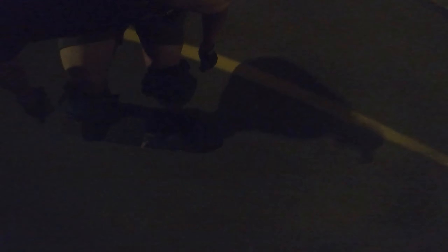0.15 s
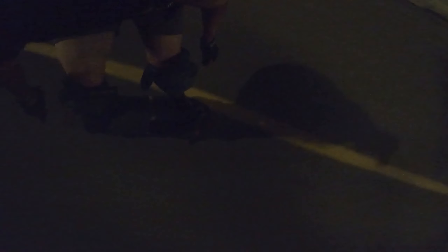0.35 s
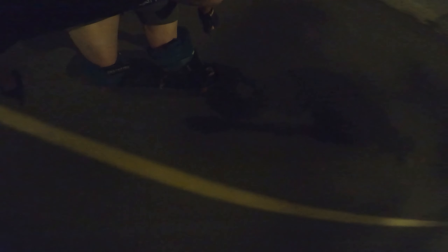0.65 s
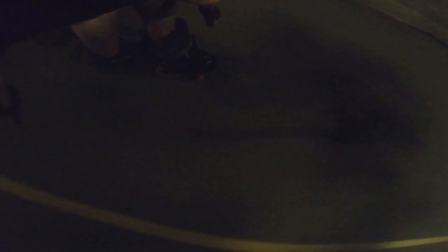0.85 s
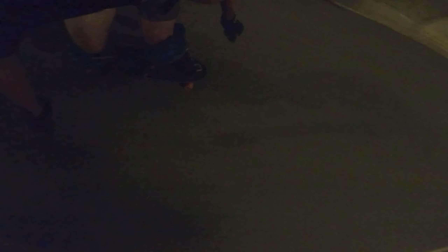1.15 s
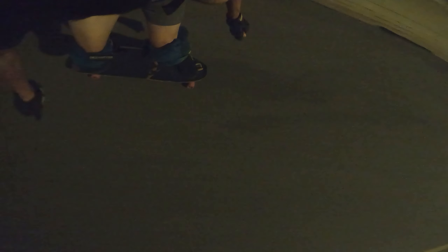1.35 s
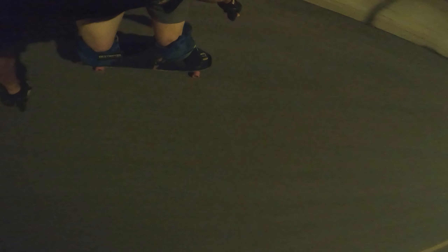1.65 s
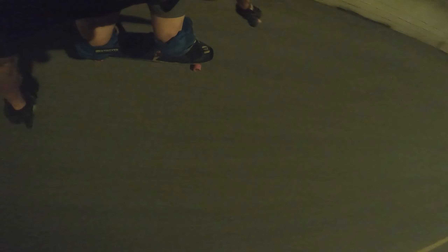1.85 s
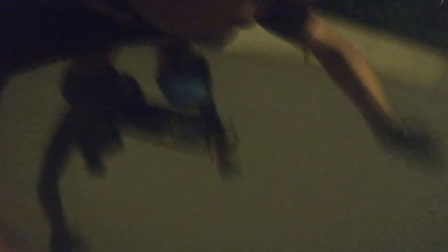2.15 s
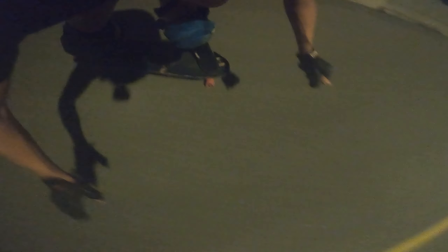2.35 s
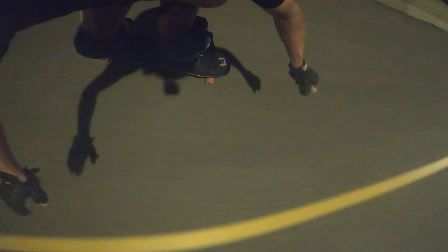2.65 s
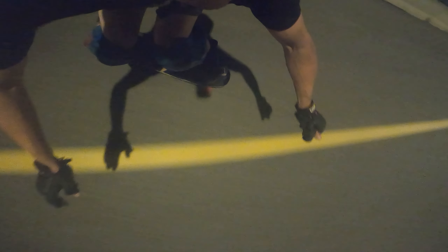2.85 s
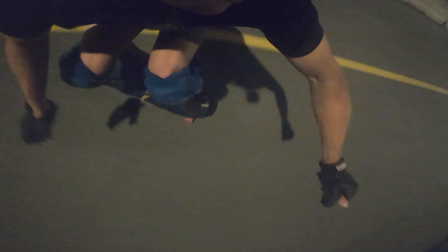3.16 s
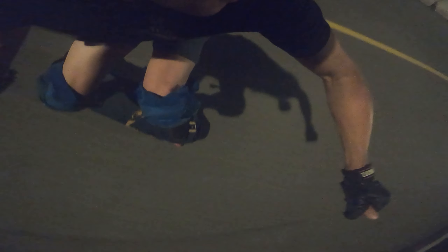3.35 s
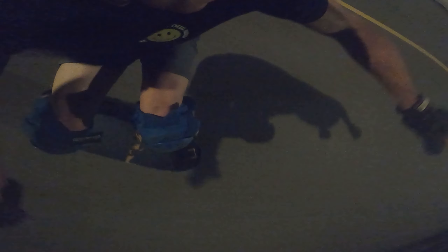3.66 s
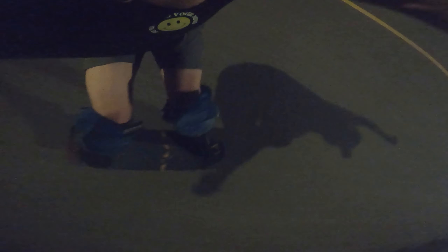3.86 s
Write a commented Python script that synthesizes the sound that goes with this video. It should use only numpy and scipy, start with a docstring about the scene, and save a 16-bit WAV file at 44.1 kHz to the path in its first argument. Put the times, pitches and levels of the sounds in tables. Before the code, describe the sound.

Skateboard wheels roar on asphalt with low buffeting wind and faint rattling ticks; around two seconds the camera case is knocked, scraped and shaken, then rolling continues quieter. Muffled, close, body-worn microphone outdoors.

```python
"""Longboard from a helmet camera

A camera in a closed case rides above a longboard on asphalt. Wind and wheel roar are shaped noise bands; the case
adds a tone, and a loose part's random clicks ring high bands. The rider's head jerks: the mount shakes as a wavering
low sine with noise overtones, noise bursts and grit ring the case as knocks and scrapes. It is quieter for a while after.
"""
import sys
import numpy as np
from scipy import signal
from scipy.fft import rfft, irfft, next_fast_len
from scipy.io import wavfile
from scipy.ndimage import uniform_filter1d, map_coordinates

SR = 44100
rng = np.random.default_rng(int(sys.argv[2]) if len(sys.argv) > 2 else 0)


def transcribe(signal):
    """Save signal, clipped to [-1, 1], as a 16-bit WAV file at the path in sys.argv[1]."""
    frames = np.atleast_2d(signal).T
    limited = np.clip(frames, -1, 1)
    pcm = np.round(limited * 32767).astype(np.int16)
    wavfile.write(sys.argv[1], SR, pcm)


def invert_db(x):
    """Field ratio 10**(x/20) for x, a level in decibels (scalar or array-like)."""
    u = np.asarray(x, float) / 20
    return 10 ** u


N = 176400

# Wind before and after its gap: time_s, rumble_db, flutter_db
WIND_LEVELS = [
    [(0.0, -31.5, -40.5), (0.22, -31.5, -36.5), (0.43, -27, -35), (0.47, -21, -54), (0.49, -31, -36),
     (0.83, -27.5, -34), (1.2, -34.5, -33.5), (1.22, -26, -33.5), (1.32, -40, -36), (1.4, -36, -42),
     (1.43, -34.5, -32.5), (1.99, -36.5, -30.5), (2.0, -15.5, -25)],
    [(2.8, -39, -67), (2.832, -44, -41), (2.98, -53, -53), (3.016, -36.5, -42), (3.226, -47.5, -49.5),
     (3.38, -39, -35), (3.394, -48, -45), (3.466, -28, -41.5), (3.522, -48.5, -57), (3.552, -27, -48),
     (3.66, -47, -61), (3.676, -33.5, -39.5), (3.98, -20, -25.5)],
]
# Wind spectra: freq_hz, relative_db
RUMBLE_COLOUR = [(10, -17), (20, -10.5), (50, 5.5), (70, -11), (100, -27), (200, -96)]
FLUTTER_COLOUR = [(40, -33), (70, 0), (100, 1.5), (150, -4), (200, -28.5), (400, -98.5)]
# Mount shaking: time_s, swing_rms_db, overtone_relative_db
SHAKE_LEVELS = [(1.98, -51, -37), (2.022, -19.5, -38), (2.064, -29, -28.5), (2.104, -40, -37),
                (2.142, -10.5, -26.5), (2.168, -19.5, -27.5), (2.21, -10, -31.5), (2.248, -22.5, -21.5),
                (2.286, -16, -16), (2.318, -11.5, -31.5), (2.34, -16, -23), (2.358, -28, -39),
                (2.382, -23, -27), (2.4, -39, -40.5), (2.426, -14, -17), (2.442, -11.5, -24),
                (2.468, -10, -34), (2.494, -42, -18), (2.514, -14, -30.5), (2.538, -42, -58),
                (2.548, -25, -37), (2.566, -20, -33), (2.6, -33, -36), (2.618, -34, -59),
                (2.648, -28.5, -54), (2.688, -51, -44.5), (2.732, -26.5, -44.5), (2.754, -34, -58),
                (2.776, -47, -42), (2.82, -42, -53)]
# Shaking overtone spectrum: freq_hz, relative_db
OVERTONE_COLOUR = [(53, -33.5), (90, 4), (205, -5.5), (371, -13), (411, -29.5), (700, -20), (910, -61.5),
                   (1540, -120)]
# Scrapes inside the wall: start_s, rise_s, fall_s, level_db, tilt_db_per_octave, favoured_hz
SCRAPES = [(1.953, 0.031, 0.012, -20.5, 1.5, 3950), (2.0, .01, 0.065, -29.5, .5, 6400),
           (2.102, 0.1, 0.023, -29.5, -9, 3300), (2.245, 0.014, 0.031, -26.5, -4.5, 700),
           (2.258, .024, 0.0038, -11.5, 1.5, 6900), (2.287, 0.012, .008, -18, -9, 2700),
           (2.32, 0.0088, 0.0052, -29, -19, 1360), (2.387, 0.027, 0.049, -30, -5.5, 3300),
           (2.431, 0.016, 0.0094, -21.5, -10.5, 1850), (2.453, 0.012, 0.0043, -22, -5.5, 1360),
           (2.48, 0.0097, 0.013, -41, 1.5, 700)]
# Knocks inside the wall: start_s, peak_db, tilt_db_per_octave, spread_s, favoured_hz
KNOCKS = [(1.9734, -2.5, 2, 0.0036, 3950), (1.9946, -9.5, 2, 0.0033, 3300),
          (2.2422, -14, -12, 0.0029, 1900), (2.2851, -1, 5, 0.0013, 3300), (2.301, -9.5, -6, .003, 1360),
          (2.3461, -18, -6, 0.00067, 2650), (2.377, -12, 0.5, 0.0035, 2550)]
# Case resonances: centre_hz, width_hz, relative_db
CASE_MODES = [(700, 220, -9), (1360, 150, 4.5), (1850, 360, -6.5), (2627, 450, -4.5), (3300, 170, 0.5),
              (3950, 150, 0.5), (4690, 1100, -5.5), (6400, 500, -17.5), (6900, 150, -10),
              (8800, 1200, -28.5), (10600, 2500, -31.5), (11700, 600, -25)]
# Loose part's rattle: time_s, then relative_db of the low, middle and high ringing bands
RATTLE_LEVELS = [(0.0, -49, -77.5, -94.5), (0.4, -55, -77, -90), (0.66, -58.5, -79, -96),
                 (0.88, -56.5, -77.5, -89), (1.17, -57, -69, -87), (1.43, -54, -66.5, -87),
                 (1.65, -55.5, -68.5, -89), (1.94, -57, -70.5, -83), (2.17, -51, -67.5, -74.5),
                 (2.33, -60, -67, -81), (2.5, -58, -72.5, -85.5), (2.79, -61, -74, -97),
                 (3.04, -59.5, -82.5, -100), (3.44, -63, -82.5, -99), (3.81, -70, -76.5, -86),
                 (3.95, -64, -72, -87)]
# Low rattle band's slow rise and fall in level: time_s, added_db
LOW_BAND_SWELL = [(0, -14), (.75, -7), (.95, -1.5), (2.45, -2.5), (2.6, -5), (4, -13.5)]
# Loose part's resonances, one list a band: centre_hz, width_hz, db_per_pass
PART_BANDS = [
    [(3997, 270, 0)],
    [(6400, 650, 10), (6880, 200, -8.5)],
    [(10700, 350, -9.5), (12000, 640, 0.5), (13300, 400, -11.5)],
]
# Louder single rattles: start_s, peak_db
TICKS = [(.818, -42), (0.9862, -34.5), (1.0825, -35), (1.2146, -35.5), (1.243, -32), (1.296, -38),
         (1.3088, -30.5), (1.3464, -30), (1.356, -43), (1.4672, -37.5), (1.484, -33.5), (1.571, -29.5)]
# Tick resonances: centre_hz, width_hz, db_per_pass
TICK_MODES = [(2940, 360, -2.5), (3810, 390, 1), (6400, 450, -7.5), (12050, 800, -21)]
# Wheels: time_s, low_roar_db, middle_roar_db, upper_roar_db, case_tone_db, hiss_db
WHEEL_LEVELS = [(0.0, -37, -36.5, -42.5, -40.5, -43), (0.19, -32.5, -38, -44.5, -37.5, -43),
                (0.42, -35.5, -35.5, -41.5, -34.5, -42.5), (0.65, -37, -39.5, -44.5, -37, -44.5),
                (0.91, -35.5, -41.5, -43.5, -34.5, -43.5), (1.12, -36, -47, -42.5, -36, -41.5),
                (1.38, -34.5, -41.5, -42, -35.5, -42), (1.63, -33.5, -42.5, -41, -34, -41),
                (1.85, -32.5, -40, -37, -33, -39.5), (2.01, -35.5, -39, -41, -35, -41.5),
                (2.15, -46.5, -43, -39, -30.5, -35.5), (2.29, -30.5, -36.5, -36, -32, -34),
                (2.35, -37.5, -51, -55, -38.5, -41.5), (2.44, -43.5, -45, -40, -52, -44.5),
                (2.53, -54, -56, -50, -44, -51.5), (2.65, -46, -58, -53, -44, -50),
                (2.84, -47.5, -56.5, -51, -44, -50), (3.17, -42, -49, -49, -41, -49.5),
                (3.4, -41.5, -49.5, -48, -42, -47.5), (3.59, -42.5, -41.5, -45.5, -36.5, -46),
                (3.86, -41, -40.5, -44.5, -39.5, -46), (3.98, -37, -36, -38.5, -34.5, -39.5)]
# Wheel spectra: freq_hz, relative_db
LOW_ROAR_COLOUR = [(100, -22.5), (150, -3.5), (205, -5), (255, 1.5), (310, -6), (370, -21.5), (600, -79)]
MIDDLE_ROAR_COLOUR = [(250, -40), (350, -9.5), (445, 2), (540, -7), (620, -8), (800, -31), (1500, -89)]
UPPER_ROAR_COLOUR = [(350, -36.5), (580, -14), (700, 0), (900, -3), (1020, 2), (1150, 1), (1500, -23.5),
                     (2500, -83.5)]
HISS_COLOUR = [(1300, -22), (1550, 5), (1800, 0), (2200, -14.5), (2700, -8.5), (3300, -7.5), (4200, -15),
               (4550, -19), (4850, -16.5), (5150, -24), (5600, -26.5), (6500, -31), (7200, -35),
               (8700, -39.5), (9300, -50), (11200, -61), (14000, -77.5)]

FLOOR_DB = -112
SHAKE_HZ, SHAKE_WANDER = 43.3, 0.2  # mean pitch, wander as a fraction of it
GRIT_PER_S, GRIT_SPREAD_DB = 3000, 5
FAVOUR_DB, FAVOUR_OCTAVES = 7.5, 0.062
WALL_HZ = 5400
RATTLES_PER_S, RATTLE_SPREAD_DB, RATTLE_GAIN_DB = 600, 4, 5
CASE_TONE_HZ, CASE_TONE_WIDTH_HZ = 1333.6, 309  # width of one pass
DIP_S, DIP_WIDTH_S, DIP_DB = 2.362, 0.011, -4
CEILING = 0.97


def unit(x):
    """Scale to rms 1."""
    return x / np.sqrt(np.mean(x ** 2) + 1e-20)


def curves(rows):
    """Interpolate each column after the time, one value a sample."""
    time_s, *columns = np.transpose(rows)
    return [np.interp(np.arange(N) / SR, time_s, column) for column in columns]


def wobble(knots_per_s):
    """Smooth random curve through Gaussian knots."""
    knots = rng.standard_normal(int(N * knots_per_s / SR) + 4)
    return map_coordinates(knots, [np.arange(N) * knots_per_s / SR])


def filtered(x, response):
    """Multiply the spectrum of x by a response of frequency."""
    size = next_fast_len(len(x) + 8192)
    return irfft(rfft(x, size) * response(np.fft.rfftfreq(size, 1 / SR)), size)[:len(x)]


def colour(points):
    """Gain through (freq_hz, relative_db) points on a log axis."""
    freq_hz, gain_db = np.transpose(points)
    return lambda hz: invert_db(np.interp(np.log(hz + 1), np.log(freq_hz + 1), gain_db))


def body(modes, tilt_db=0, favoured_hz=1):
    """Causal sum of resonances tilted about 3 kHz; the contact point excites those near favoured_hz more."""
    def gain(centre, db):
        octaves_off = np.log2(centre / favoured_hz)
        favour_db = FAVOUR_DB * np.exp(-(octaves_off / FAVOUR_OCTAVES) ** 2)
        return invert_db(db + tilt_db * np.log2(centre / 3000) + favour_db)

    def response(f):
        total = 0
        for k, (centre, width, db) in enumerate(modes):
            mode = 1j * f * width / (centre * centre - f * f + 1j * f * width)
            total = total + (-1) ** k * gain(centre, db) * mode  # alternating polarity
        return total
    return response


def steep(modes):
    """Sum of resonances, each applied twice for steeper skirts."""
    return lambda f: sum(body([mode])(f) ** 2 for mode in modes)


def patchy(spread_db):
    """White noise with time-frequency patches of random gain."""
    z = signal.stft(rng.standard_normal(N), nperseg=512)[2]
    field = uniform_filter1d(rng.standard_normal(z.shape), size=5, axis=0)
    field = uniform_filter1d(field, size=6, axis=1)
    return signal.istft(z * invert_db(spread_db * unit(field)), nperseg=512)[1][:N]


def grains(count, per_s, spread_db):
    """Random clicks of uneven size and sign."""
    u, size = rng.random((2, count)), rng.standard_normal(count)
    return (u[0] < per_s / SR) * np.sign(u[1] - 0.5) * invert_db(spread_db * size)


def blow(ring, spread_s):
    """Short burst of contact noise rings a body; peak 1."""
    t = np.arange(SR // 10) / SR
    contact = rng.standard_normal(len(t)) * np.exp(-t / spread_s) * (1 - np.exp(-t / 0.00049))
    x = filtered(contact, ring)
    return x / np.abs(x).max()


def add(out, start_s, x):
    """Mix x into out at start_s."""
    out[round(start_s * SR):][:len(x)] += x


def noise_floor():
    """Faint white noise."""
    return invert_db(FLOOR_DB) * rng.standard_normal(N)


def wind():
    """Lumpy buffeting: one uneven noise in rumble and flutter bands, silent for a gap."""
    air = patchy(0.51) * invert_db(0.53 * wobble(21))
    levels = curves(WIND_LEVELS[0] + WIND_LEVELS[1])
    bands = RUMBLE_COLOUR, FLUTTER_COLOUR
    out = sum(invert_db(db) * unit(filtered(air, colour(band))) for db, band in zip(levels, bands))
    gap = np.interp(np.arange(N) / SR, [1.98, 2.02, 2.78, 2.82], [1, 0, 0, 1])
    return gap * out


def shake():
    """The mount swings at a wavering low pitch; rough noise overtones ride on it."""
    first_s, last_s = SHAKE_LEVELS[0][0], SHAKE_LEVELS[-1][0]
    rows = [(first_s - 0.03, -70, -70)] + SHAKE_LEVELS + [(last_s + 0.03, -70, -70)]
    swing_db, overtone_db = curves(rows)
    phase = 2 * np.pi * np.cumsum(SHAKE_HZ * (1 + SHAKE_WANDER * wobble(15))) / SR
    swing = invert_db(swing_db) * np.sqrt(2) * np.sin(phase)
    rough = invert_db(2.65 * wobble(60)) * patchy(0.37)
    return swing + invert_db(overtone_db + 1.5) * unit(filtered(rough, colour(OVERTONE_COLOUR)))


def scrapes():
    """Grit under a stroke that swells and fades rings the case."""
    out, t = np.zeros(N), np.arange(SR // 4) / SR
    for start_s, rise_s, fall_s, db, tilt_db, hz in SCRAPES:
        clicks = grains(len(t), GRIT_PER_S, GRIT_SPREAD_DB)
        grit = unit(filtered(clicks, body(CASE_MODES, tilt_db, hz)))
        fade = np.exp(-np.abs(t - rise_s) / fall_s)
        stroke = np.where(t < rise_s, (t / rise_s) ** 0.87, fade)
        add(out, start_s, invert_db(db) * grit * stroke)
    return out


def knocks():
    """Blows on the case, each ringing its resonances."""
    out = np.zeros(N)
    for start_s, db, tilt_db, spread_s, hz in KNOCKS:
        add(out, start_s, invert_db(db) * blow(body(CASE_MODES, tilt_db, hz), spread_s))
    return out


def walled(x):
    """The case wall dulls the treble: three gentle low-passes."""
    return filtered(x, lambda hz: (1 + 1j * hz / WALL_HZ) ** -3)


def rattle():
    """A loose part buzzes in clumps of small clicks ringing three bands, now and then harder."""
    clicks = unit(grains(N, RATTLES_PER_S, RATTLE_SPREAD_DB))
    dense = (clicks + 0.7 * rng.standard_normal(N)) * invert_db(1.5 * wobble(29.86))
    levels = curves(RATTLE_LEVELS)
    levels[0] = levels[0] + curves(LOW_BAND_SWELL)[0]
    out = np.zeros(N)
    for db, modes in zip(levels, PART_BANDS):
        clumps = dense * invert_db(2.1 * wobble(14))
        out += invert_db(db + RATTLE_GAIN_DB) * unit(filtered(clumps, steep(modes)))
    for start_s, db in TICKS:
        add(out, start_s, invert_db(db) * blow(steep(TICK_MODES), 0.0025))
    return out


def wheels():
    """Road texture shakes wheels and deck: three roar bands, the case's main tone, hiss."""
    road = patchy(0.61) * invert_db(0.67 * wobble(25.01))
    one_pass = body([(CASE_TONE_HZ, CASE_TONE_WIDTH_HZ, 0)])
    responses = (colour(LOW_ROAR_COLOUR), colour(MIDDLE_ROAR_COLOUR), colour(UPPER_ROAR_COLOUR),
                 lambda f: one_pass(f) ** 3, colour(HISS_COLOUR))
    levels = curves(WHEEL_LEVELS)
    return sum(invert_db(db) * unit(filtered(road, response)) for db, response in zip(levels, responses))


def brief_dip():
    """Gain under which wheels and rattle dip briefly."""
    t = np.arange(N) / SR
    return invert_db(DIP_DB * np.exp(-((t - DIP_S) / DIP_WIDTH_S) ** 4))


def scene():
    """Sum all sources in one microphone."""
    rolling = brief_dip() * (wheels() + rattle())
    impacts = walled(knocks() + scrapes())
    mix = wind() + rolling + impacts + shake() + noise_floor()
    return mix[None]


def low_pass(x):
    """Removes everything above the highest recorded frequency."""
    return signal.sosfilt(signal.butter(12, 14200, fs=SR, output="sos"), x)


def record(dry):
    """Soft clipping near full scale."""
    mix = dry / (1 + np.abs(dry / CEILING) ** 6) ** (1 / 6)
    return low_pass(mix)


dry = scene()
out = record(dry)
transcribe(out)
```